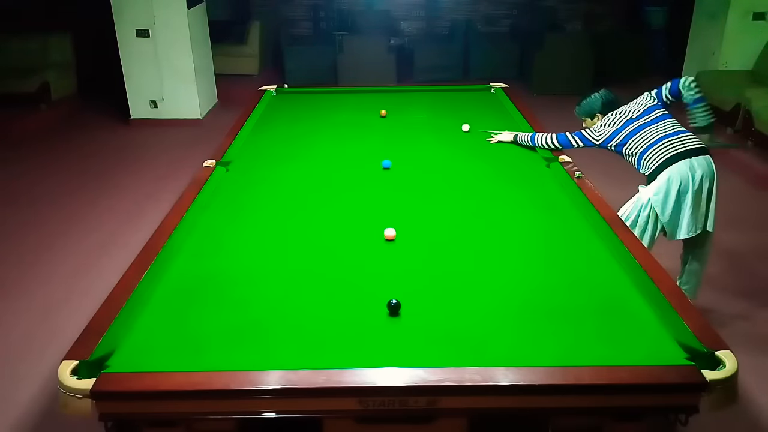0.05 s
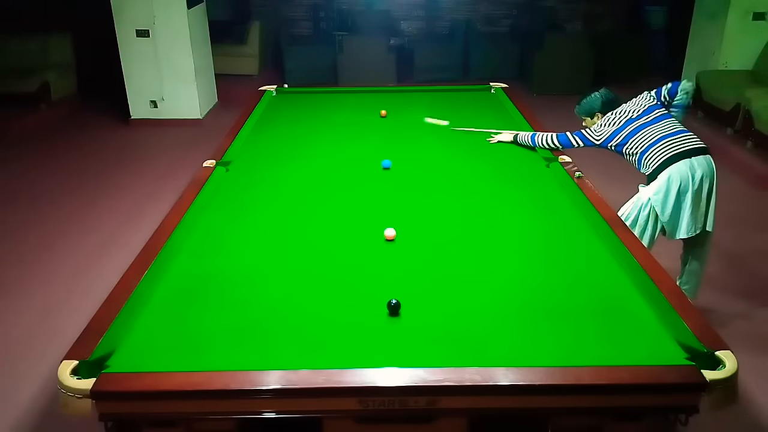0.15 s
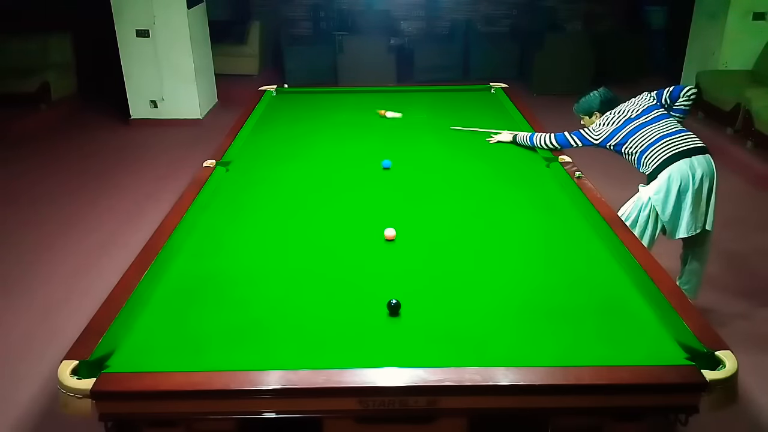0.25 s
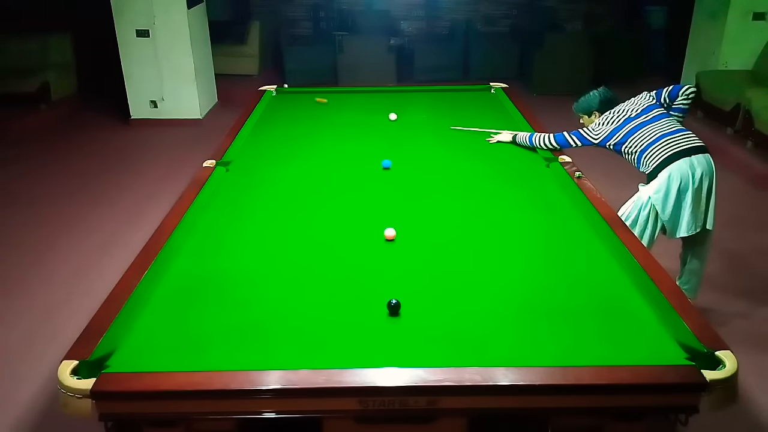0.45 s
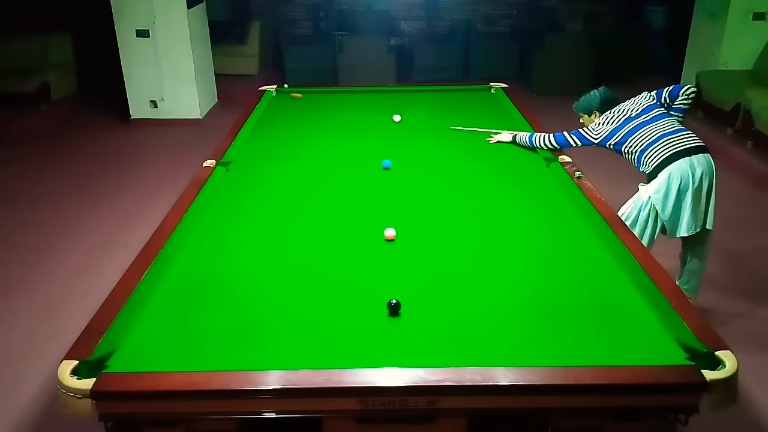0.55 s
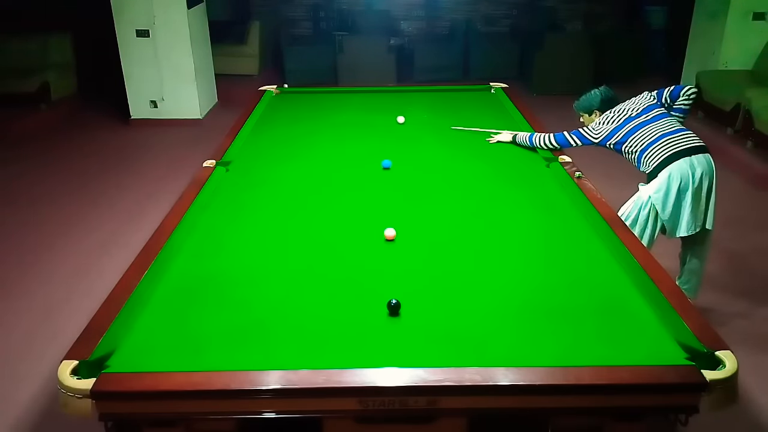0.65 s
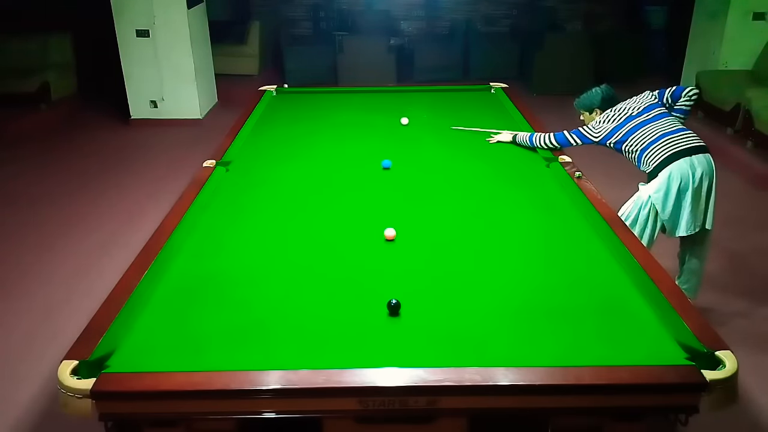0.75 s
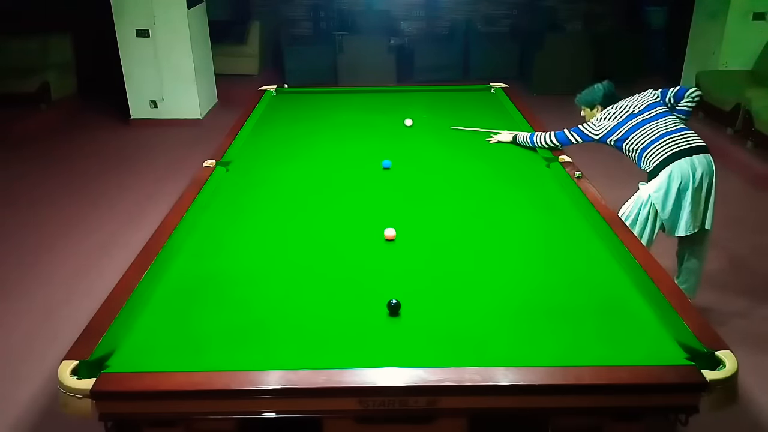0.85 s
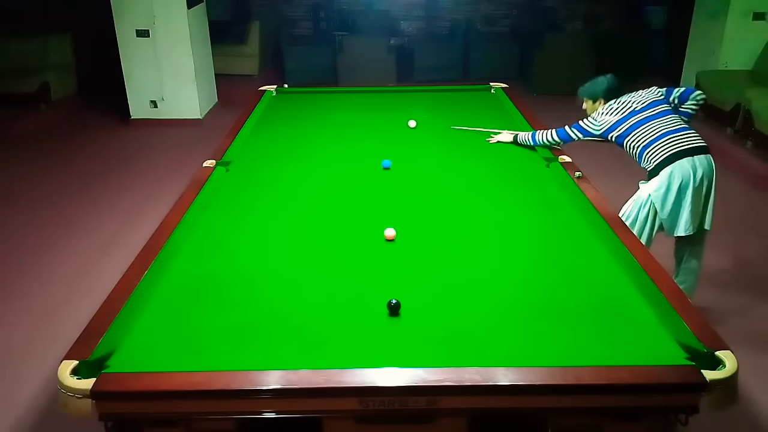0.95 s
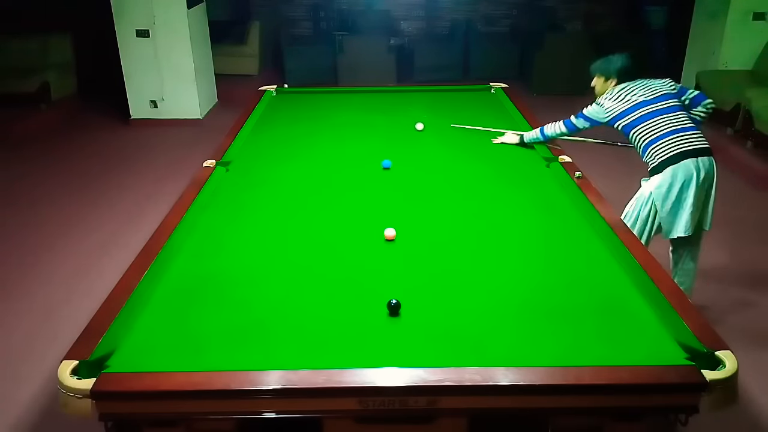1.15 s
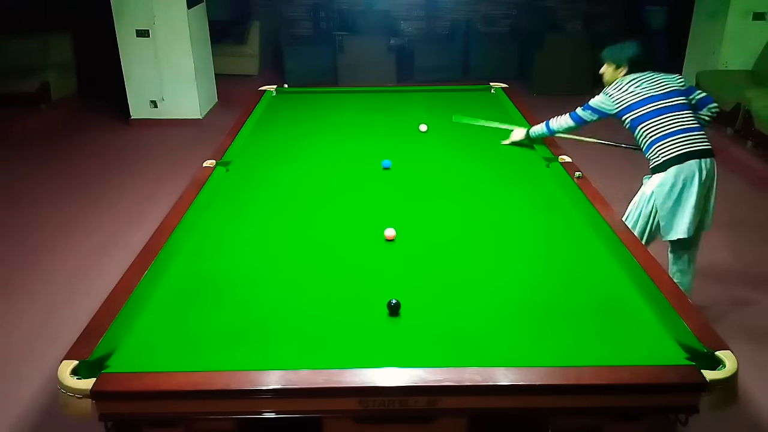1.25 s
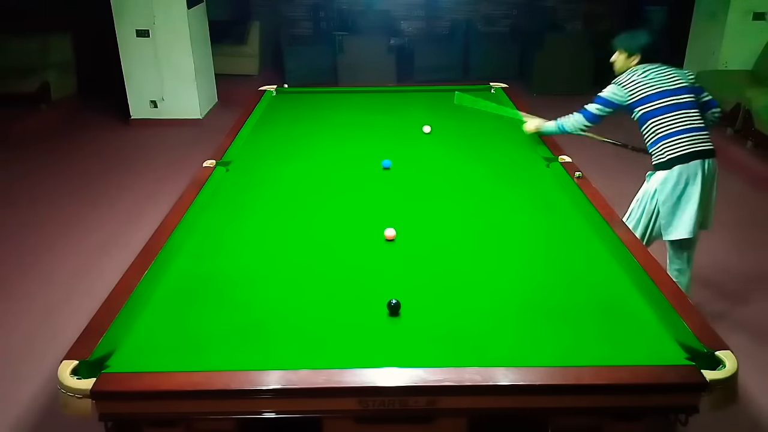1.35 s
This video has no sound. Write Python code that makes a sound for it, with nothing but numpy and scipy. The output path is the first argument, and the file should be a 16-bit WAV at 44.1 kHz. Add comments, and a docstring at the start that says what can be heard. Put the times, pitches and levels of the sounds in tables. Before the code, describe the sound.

A snooker shot: cue knock, sharp ball click, then a rattle into the pocket.

```python
"""Snooker shot in a hard-walled hall

At the far end, the cue knocks the white, which rolls on the slate and clicks against a colour.
That ball rattles in the pocket jaws, rings the rail and thuds down into the pocket.
Cloth swishes faintly as the player moves. Most of the sound is the hall's answer, over a low room hum."""
import sys
import numpy as np
from scipy import signal
from scipy.fft import rfft, irfft, next_fast_len
from scipy.io import wavfile
from scipy.ndimage import map_coordinates

SR = 44100
rng = np.random.default_rng(int(sys.argv[2]) if len(sys.argv) > 2 else 0)


def store_wav(level_fs):
    """Save 16-bit WAV to argv[1]."""
    pcm = np.round(np.clip(np.atleast_2d(level_fs), -1, 1) * 32767)
    wavfile.write(sys.argv[1], SR, pcm.T.astype(np.int16))


N = 61739
TIME_S = np.arange(N) / SR
FFT_SIZE = 2 * next_fast_len(N)
GRID_HZ = np.fft.rfftfreq(FFT_SIZE, 1 / SR)


def amp(db):
    """Decibels to gain."""
    return 10 ** (np.asarray(db) / 20)


def unit_rms(x):
    """Scale to rms 1."""
    return x / np.sqrt(np.mean(x ** 2) + 1e-20)


def value_at(curve, hz):
    """Read (freq_hz, value) rows on a log frequency axis."""
    freq_hz, values = np.transpose(curve)
    return np.interp(np.log(hz + 1), np.log(freq_hz + 1), values)


def envelope(rows):
    """Gain per sample from (time_s, level_db) rows."""
    return amp(np.interp(TIME_S, *np.transpose(rows)))


def smooth_noise(positions):
    """Smooth curve with a random knot at each whole position."""
    return map_coordinates(rng.standard_normal(N // 50), [positions], mode="wrap")


def wobble(rate_hz):
    """Smooth random motion in time."""
    return smooth_noise(TIME_S * rate_hz)


def filtered(x, response):
    """Apply a response given on GRID_HZ."""
    return irfft(rfft(x, FFT_SIZE) * response)[..., :N]


def timbre(spectrum, ripple_db=0, ripple_step_hz=55):
    """Minimum-phase response of unit energy; ripple adds the hall's random peaks and dips."""
    ripple = smooth_noise(GRID_HZ / ripple_step_hz)
    gain = unit_rms(amp(value_at(spectrum, GRID_HZ) + ripple_db * ripple))
    cepstrum = irfft(np.log(np.maximum(gain, 1e-6)))
    cepstrum[1:FFT_SIZE // 2] *= 2
    cepstrum[FFT_SIZE // 2 + 1:] = 0
    return np.exp(rfft(cepstrum))


def delayed(stereo, delay_s):
    """Shift later, keeping N samples."""
    return np.pad(stereo, ((0, 0), (round(delay_s * SR), 0)))[:, :N]


def pan(left_over_right_db):
    """Left and right gains."""
    return amp(np.array([[.5], [-.5]]) * left_over_right_db)


# Likeness of left and right in the hall: freq_hz, correlation
HALL_COHERENCE = [(60, 0.68), (250, 0.66), (1000, 0.52), (2200, 0.39), (4500, 0.44), (9000, 0.86)]
# Hall balance: freq_hz, left_over_right_db
HALL_BALANCE = [(60, 2), (250, 5), (600, 4), (2000, 3), (4500, 1.2), (9000, -0.5)]


def spread(pair):
    """Two unrelated signals become the hall's partly alike left and right."""
    angle = np.arccos(value_at(HALL_COHERENCE, GRID_HZ)) / 2
    mid, side = filtered(pair, np.array([np.cos(angle), np.sin(angle)]))
    return filtered(np.array([mid + side, mid - side]), pan(value_at(HALL_BALANCE, GRID_HZ)))


def hall_noise(spectrum):
    """Shaped stereo noise of rms 1."""
    noise = spread(rng.standard_normal((2, N)))
    return unit_rms(filtered(noise, timbre(spectrum)))


def arrivals(paths):
    """One panned impulse per path to the microphone."""
    impulse = signal.unit_impulse(N)
    return sum(delayed(amp(db) * pan(side_db) * impulse, delay_s) for delay_s, db, side_db in paths)


# Hall reverberation: freq_hz, t60_s
HALL_DECAY = [(100, 1.5), (300, 1.0), (1100, 1.1675), (2600, 1.0448), (4500, 0.82), (7000, 0.73),
              (12000, 0.24)]


def hall(early_db, late_db, gap_s, rise_s, hold_s, fade_60db_s, spikiness):
    """Answer to one blow: spiky wall echoes and a smooth tail, both then damped, treble first."""
    noise = rng.standard_normal((2, N))
    echoes = unit_rms(noise * np.exp(spikiness * np.tanh(rng.standard_normal(N))))
    fade = amp(-60 * np.maximum(TIME_S - hold_s, 0) / fade_60db_s)
    early = echoes * (1 - np.exp(-TIME_S / rise_s)) * fade
    late = rng.standard_normal((2, N)) * (1 - np.exp(-TIME_S / 0.028))
    band_hz, frame_s, bands = signal.stft(amp(early_db) * early + amp(late_db) * late, SR, nperseg=256)
    damping = amp(-60 * frame_s / value_at(HALL_DECAY, band_hz)[:, None])
    _, answer = signal.istft(bands * damping, SR, nperseg=256)
    return delayed(spread(answer[:, :N]), gap_s)


def ring(modes, attack_s, flutter_db, blur_hz, blur_rad=0.4):
    """Decaying modes, their phase and level blurred by the hall."""
    ringing = np.zeros((2, N))
    for pitch_hz, level_db, t60_s in modes:
        drift = blur_rad * (wobble(blur_hz) + np.array([wobble(blur_hz), wobble(blur_hz)]))
        tone = np.sin(2 * np.pi * pitch_hz * TIME_S + drift) * amp(flutter_db * wobble(blur_hz))
        ringing += tone * amp(level_db - 60 * TIME_S / t60_s) * pan(value_at(HALL_BALANCE, pitch_hz))
    return ringing * (1 - np.exp(-TIME_S / attack_s))


# Room hum: freq_hz, gain_db
HUM_SPECTRUM = [(25, -14), (60, -12), (110, -1), (165, 5.5), (230, -6.5), (350, -13.5), (720, -11.5),
                (1600, -17.5), (4000, -21.5), (8000, -25.5), (15500, -31)]


def room_hum(level_db=-70.5):
    """Steady low noise of the room."""
    return amp(level_db) * hall_noise(HUM_SPECTRUM)


# Cue to microphone: delay_s, gain_db, left_over_right_db
CUE_PATHS = [(0, -11, 4), (.0015, -15, 4), (.0058, -12, 4), (.0075, -13, 3)]
# Tip on ball: freq_hz, gain_db
CUE_SPECTRUM = [(88, -42), (190, -23), (290, -8), (400, -10), (1200, -5), (1400, -9), (1940, -2.5),
                (2500, -10), (2950, -16.5), (3400, -9), (4050, -8.5), (4400, -12), (4680, -26), (5000, -14),
                (5600, -11.5), (6800, -20.5), (10000, -27.5), (11700, -34.5), (12200, -40), (12650, -21.5),
                (13400, -63), (14550, -26.5), (14950, -64), (15400, -28.5), (15900, -42)]
# Cue resonances: pitch_hz, gain_db, t60_s
CUE_MODES = [(1212, -12, .58), (1908, -11, .39), (1954, -12, .6), (2269, -12, .7), (2521, -11, .45),
             (3225, -14, .35), (4097, -6, .3), (4180, -7, .3), (4646, 1.5, .31), (4698, -2, .27),
             (5905, -11, .27)]


def cue_strike(start_s=0.2131):
    """The tip knocks the white; shaft and ferrule ring."""
    reverb = hall(early_db=-31.5, late_db=-34, gap_s=0.001146, rise_s=0.012,
                  hold_s=0.041, fade_60db_s=0.36, spikiness=0.39)
    knock = filtered(arrivals(CUE_PATHS) + reverb, timbre(CUE_SPECTRUM, ripple_db=3))
    shaft = amp(-30) * ring(CUE_MODES, attack_s=0.024, flutter_db=1, blur_hz=47)
    return delayed(knock + shaft, start_s)


# Rolling rumble: time_s, gain_db
ROLL_ENVELOPE = [(0.21, -66), (0.26, -50.5), (0.31, -49), (0.38, -49), (0.46, -42), (0.52, -46.5),
                 (0.60, -57.5), (0.68, -58.5), (1.4, -56.5)]
# Slate bed: freq_hz, gain_db
BED_SPECTRUM = [(25, -19), (70, -19.5), (110, -8.5), (160, -1), (205, -11), (262, -5), (330, -10),
                (450, -14.5), (1500, -61)]
# Bed resonance: time_s, level_db
DRONE_ENVELOPE = [(0.22, -81), (0.27, -48.5), (0.31, -42), (0.37, -57), (0.42, -51.5), (0.47, -49.5),
                  (0.52, -56), (0.57, -97)]


def rolling(drone_hz=259.3):
    """Rolling balls rumble on the slate bed, which drones unevenly at one resonance."""
    phase = 2 * np.pi * drone_hz * TIME_S + 0.81 * wobble(rate_hz=30)
    drone = np.sin(phase) * amp(1.5 * wobble(rate_hz=38)) * pan(9.9)
    rumble = amp(-8.5) * envelope(ROLL_ENVELOPE) * hall_noise(BED_SPECTRUM)
    return rumble + envelope(DRONE_ENVELOPE) * drone


# Click to microphone: delay_s, gain_db, left_over_right_db
CLICK_PATHS = [(0, -6, 2), (.01408, -1.5, 2.4), (.0235, -13, 2), (.0263, -12, 3)]
# Click along those paths: freq_hz, gain_db
SNAP_SPECTRUM = [(200, -32), (1500, -32), (2600, -10.5), (4300, 5), (5600, -2), (7000, -18.5), (8500, -23),
                 (10000, -45), (15000, -44.5)]
# Click in the reverberation: freq_hz, gain_db
WASH_SPECTRUM = [(150, -25), (600, -31.5), (1200, -11), (2000, -6), (3000, 0.5), (4200, 3), (5200, -3.5),
                 (6500, -12.5), (8200, -19), (9500, -45), (13000, -39), (15000, -69)]


def ball_click(start_s=0.3731):
    """Two hard balls meet for a fraction of a millisecond: direct snap, ceiling echo, then the hall."""
    snap = filtered(arrivals(CLICK_PATHS), -timbre(SNAP_SPECTRUM))
    reverb = hall(early_db=-28.5, late_db=-26, gap_s=0.014, rise_s=0.0015,
                  hold_s=0.076, fade_60db_s=0.61, spikiness=0.49)
    wash = filtered(reverb, timbre(WASH_SPECTRUM, ripple_db=3))
    return delayed(snap + wash, start_s)


# Knocks in the jaws: start_s, gain_db
JAW_KNOCKS = [(0.8124, -19), (0.8160, -0.5), (0.829, -3.5), (0.8407, -5.5), (0.8571, -7), (0.8799, -5)]
# Ball on jaw: freq_hz, gain_db
JAW_SPECTRUM = [(60, -49), (130, -21), (200, -4.5), (290, -13), (370, -18.5), (490, -2), (630, -12),
                (800, -4.5), (890, -1.5), (1100, -0.5), (1650, -7.5), (2000, -7.5), (2400, -13.5),
                (3200, -23.5), (5000, -28.5), (9000, -48.5), (15000, -75)]
# Rail resonances: pitch_hz, gain_db, t60_s
RAIL_MODES = [(202, -8, .6), (277, -4, 1.2), (315, -5, .7), (496, -4, .72), (808, 1, .48), (966, -6, .8),
              (1042, 0, .9), (1084, 0, .7), (1154, -4, .8), (1218, -2, 1.1), (1361, -5, .8),
              (1451, -7, 1.0), (2024, -4, .45), (2266, -8, .46)]


def jaw_rattle():
    """The ball rattles between the cushioned jaws and sets the wooden rail ringing."""
    direct = arrivals([(0.001, -8.5, 5.8)])  # delay_s, gain_db, left_over_right_db
    blows = np.zeros((2, N))
    for start_s, gain_db in JAW_KNOCKS:
        reverb = hall(early_db=-31, late_db=-33, gap_s=0.001998, rise_s=0.00086,
                      hold_s=0.036, fade_60db_s=0.13, spikiness=0.38)
        blows += amp(gain_db) * delayed(direct + reverb, start_s)
    rail = amp(-33.5) * ring(RAIL_MODES, attack_s=0.015, flutter_db=1.5, blur_hz=21.96)
    knocks = filtered(blows, timbre(JAW_SPECTRUM, ripple_db=1.5))
    first_knock_s = JAW_KNOCKS[0][0]
    return knocks + delayed(rail, first_knock_s)


# Thuds in the pocket: start_s, gain_db
THUDS = [(0.842, -2), (0.901, -8), (1.011, -7.5), (1.13, -13.5), (1.21, -17.5)]
# Ball on pocket: freq_hz, gain_db
THUD_SPECTRUM = [(25, -11), (60, -22.5), (110, -14), (190, -2.5), (280, -0.5), (380, -19), (520, -1.5),
                 (800, -12.5), (3000, -66)]


def pocket_drop():
    """Low thuds as the ball falls through the pocket and settles, heard only through the hall."""
    blows = np.zeros((2, N))
    for start_s, gain_db in THUDS:
        reverb = hall(early_db=-36.5, late_db=-52, gap_s=0, rise_s=0.002,
                      hold_s=0.047, fade_60db_s=0.27, spikiness=0.11)
        blows += amp(gain_db) * delayed(reverb, start_s)
    return filtered(blows, timbre(THUD_SPECTRUM))


# Player's movements: peak_s, hold_s, level_db
SWISHES = [(0.846, 0.029, -53.5), (1.045, 0.036, -60), (1.17, .045, -56.5), (1.285, 0.072, -72.5)]
# Rubbing cloth: freq_hz, gain_db
CLOTH_SPECTRUM = [(1000, -18), (3000, 3), (5000, 0.5), (8000, -4), (10000, -9), (12000, -30), (15000, -25)]


def cloth_swishes(rise_s=0.02, fade_s=0.046):
    """The hiss of rubbing cloth swells quickly, holds and fades."""
    swell = np.zeros(N)
    for peak_s, hold_s, level_db in SWISHES:
        rise = np.exp(-(np.minimum(TIME_S - peak_s, 0) / rise_s) ** 2 / 2)
        fade = np.exp(-np.maximum(TIME_S - peak_s - hold_s, 0) / fade_s)
        swell += amp(level_db) * rise * fade
    flicker = amp(0.65 * wobble(rate_hz=49))
    return swell * flicker * hall_noise(CLOTH_SPECTRUM)


def scene():
    """The whole shot over the room hum."""
    impacts = cue_strike() + ball_click() + jaw_rattle() + pocket_drop()
    return impacts + rolling() + cloth_swishes() + room_hum()


def record(dry):
    """Brick-wall low-pass."""
    cutoff_hz = 15900
    return filtered(dry, GRID_HZ < cutoff_hz)


dry = scene()
out = record(dry)
store_wav(out)
```